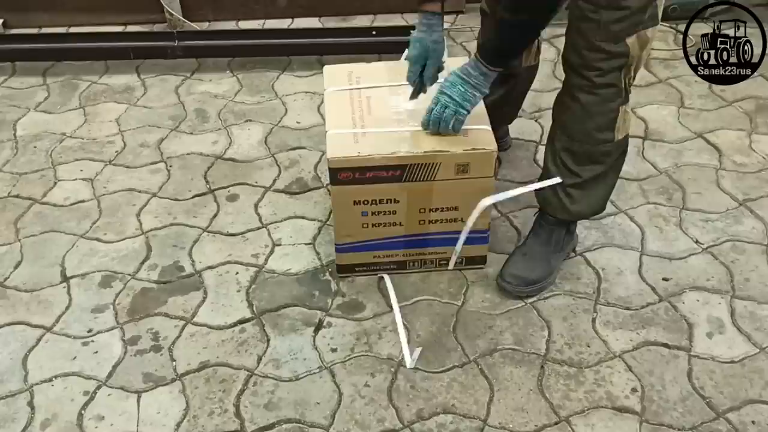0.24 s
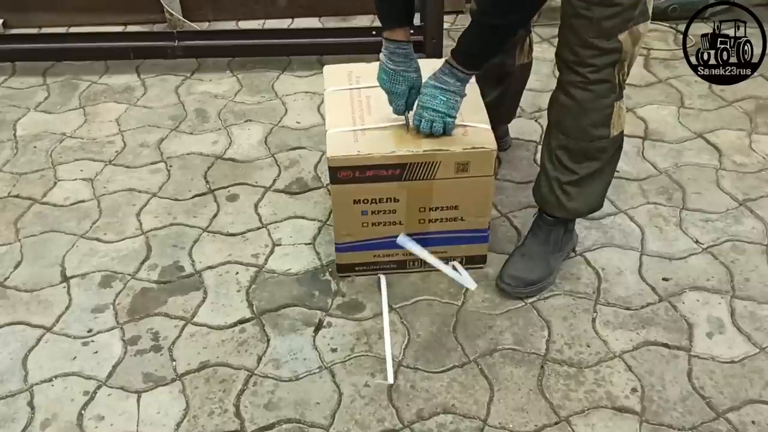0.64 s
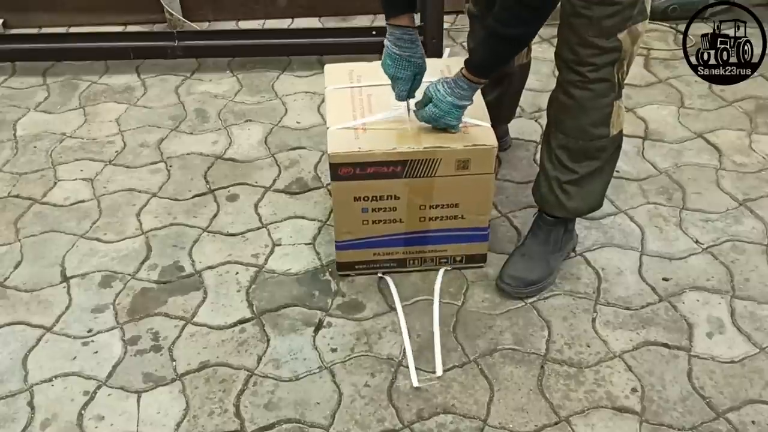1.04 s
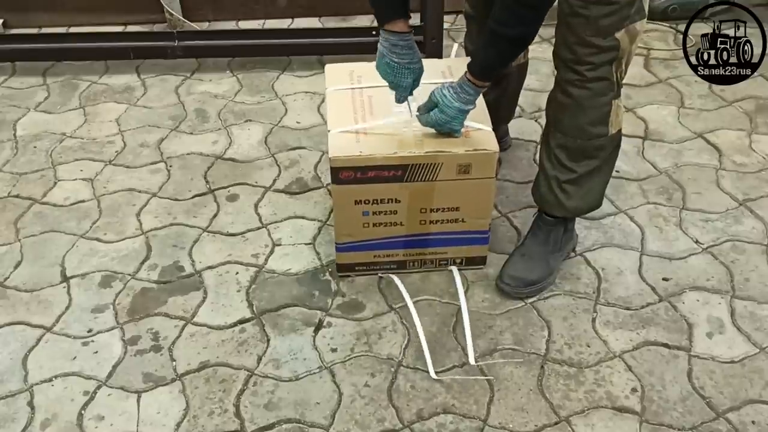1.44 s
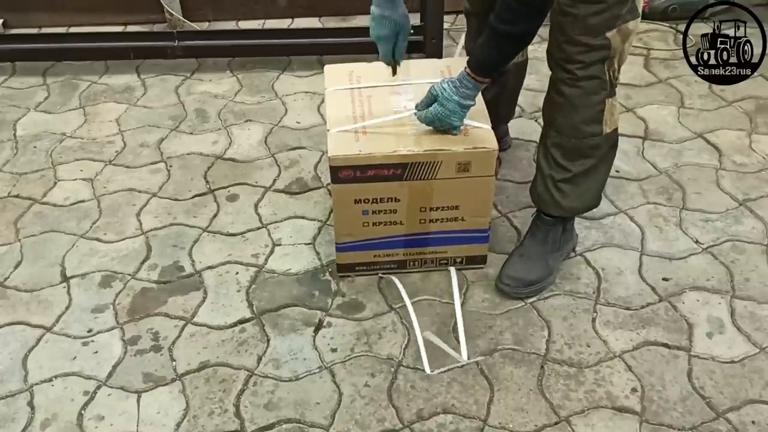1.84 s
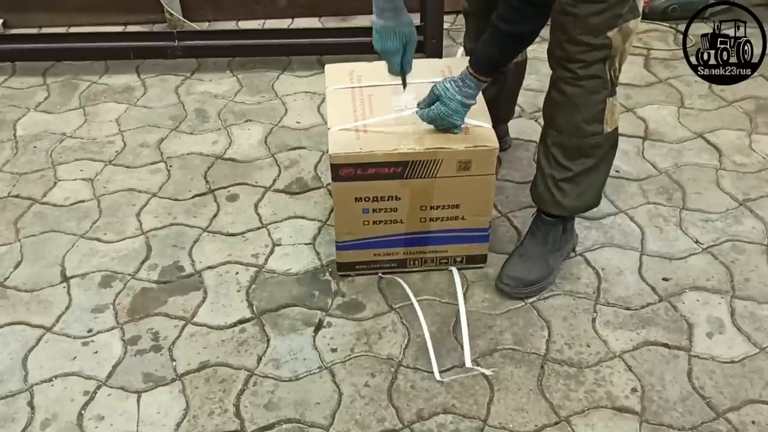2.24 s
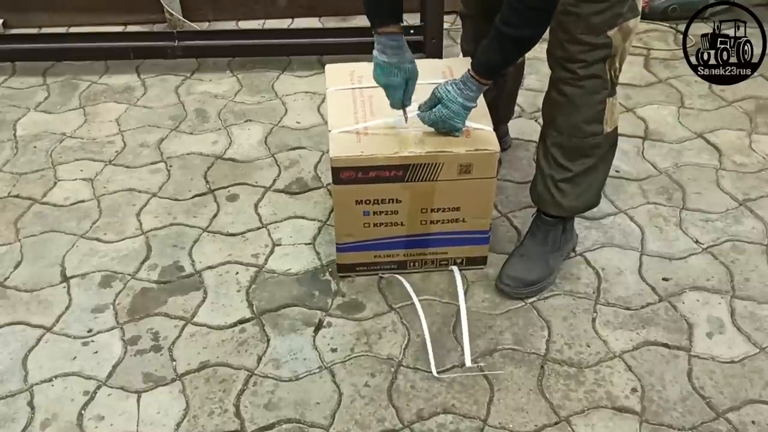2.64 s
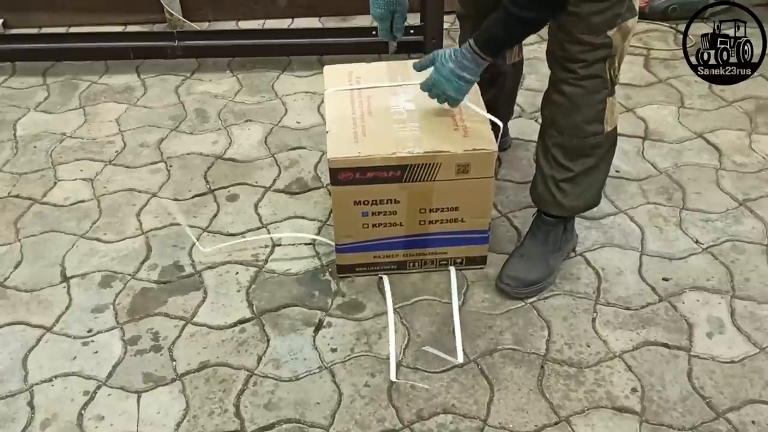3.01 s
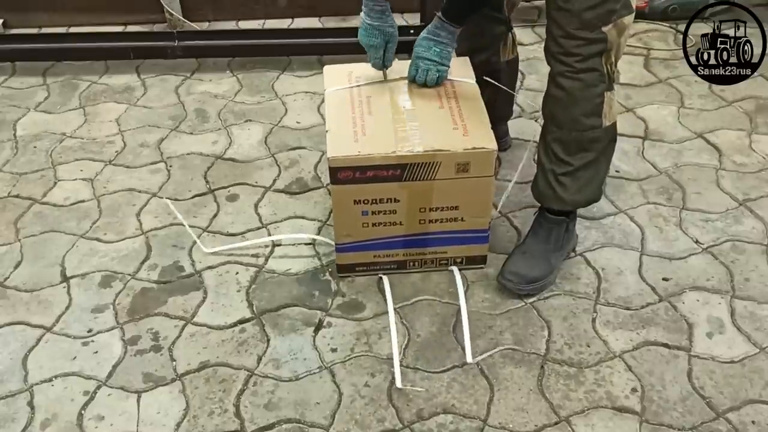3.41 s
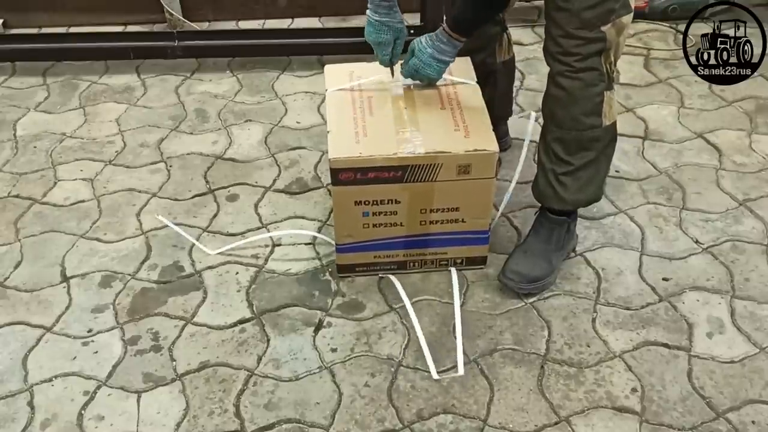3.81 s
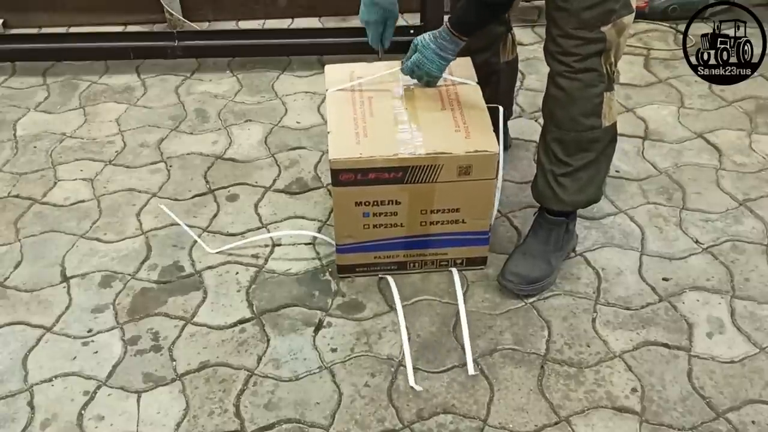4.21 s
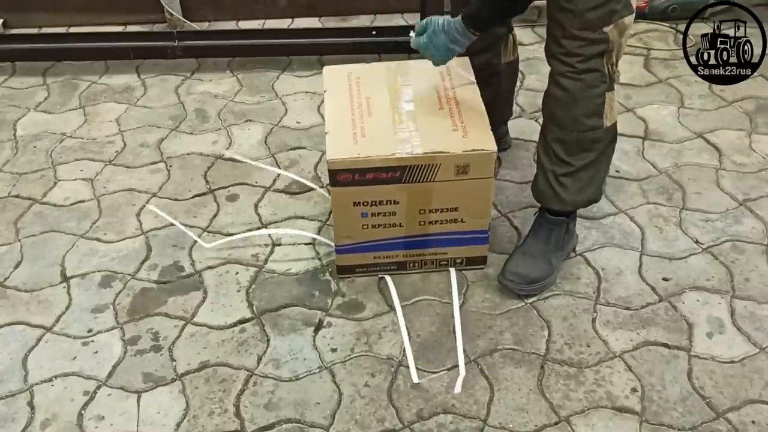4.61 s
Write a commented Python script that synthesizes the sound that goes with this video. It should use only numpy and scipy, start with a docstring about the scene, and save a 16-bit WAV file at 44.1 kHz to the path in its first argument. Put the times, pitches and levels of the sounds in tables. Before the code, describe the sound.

Plastic straps are cut from a cardboard box outdoors. After an opening crack come soft glove bumps and scrapes, then a cluster of small snaps and several louder ones, the last strong pair near the end. Small knife crunches lead into the cracks, and the strap ends ping and thump against the box. Walls echo briefly over a low hush, and the hardest hits distort the microphone slightly.

```python
"""A sharp snap dies away in a paved, walled yard, then more follow: taut plastic straps are being cut
on a cardboard box. The knife nicks a strap, it cracks apart and pings, and its ends slap the box,
which thumps. Gloves bump the card and loose straps scrape over card and paving, above quiet
outdoor air. The yard rings on, and the loudest snaps overload the microphone."""
import sys
import numpy as np
from scipy import signal
from scipy.fft import rfft, irfft
from scipy.io import wavfile
from scipy.ndimage import uniform_filter1d

SR = 44100
rng = np.random.default_rng(int(sys.argv[2]) if len(sys.argv) > 2 else 0)


def transcribe(u):
    """Save the signal u as a 16-bit wav file named by the first command-line argument.

    u: samples, shape (n,) or (channels, n), limited to [-1, 1]; the rate is SR.
    q: integer samples, one column per channel.
    """
    v = np.clip(np.atleast_2d(u).T, -1, 1)
    q = np.round(v * 32767).astype(np.int16)
    wavfile.write(sys.argv[1], SR, q)


N = 209651
LEAD = SR // 5  # pre-roll in samples, so the opening snap is already ringing at time zero
SPAN = N + LEAD
BLOW_T = np.arange(4096) / SR  # time axis of one short hit, in seconds

# Tone colours. Each row: frequency in Hz, relative level in dB.
AIR_COLOUR = [(20, -31), (70, -6.5), (150, 9.5), (400, -0.5), (800, 1), (1500, -6.5), (3500, -19.5),
              (5500, -45), (7000, -29), (10000, -20), (16000, -25)]  # low outdoor hush
YARD_COLOUR = [(40, -5.5), (120, -8.5), (250, -4), (400, 0), (600, -1), (1000, -2), (2000, -6), (4000, -5),
               (7000, -1), (9000, -9.5), (16000, -6)]  # what the walls send back
SCRAPE_COLOUR = [(100, -15), (500, 14), (1200, 0.5), (2200, 1.5), (3600, 4), (5400, -1.5), (6600, -4.5),
                 (8500, -24.5), (16000, -14.5)]  # strap edges dragging
SHUFFLE_COLOUR = [(25, -38.5), (70, 2.5), (120, 2.5), (220, -4), (400, -1.5), (800, -20.5), (2000, -38),
                  (16000, -95)]  # gloves on the hollow box
CRUNCH_COLOUR = [(100, -8), (380, 5), (700, -5.5), (1500, 0.5), (2500, -4), (4200, -6.5), (5400, -10),
                 (8000, -27), (16000, -54)]  # blade crunch, also used for glove scuffs
FIZZ_COLOUR = [(100, -37), (3000, -20), (5000, 4), (7200, 2), (8200, -14), (12000, -9.5), (16000, -8)]  # bright top of a nick
BOOM_COLOUR = [(40, -29), (70, -6.5), (130, -4), (220, 0.5), (300, -4.5), (420, -3), (600, -11.5),
               (1200, -31), (16000, -78)]  # the box's thump as it feeds the yard
SLAP_COLOUR = [(60, -34.5), (300, -17), (500, -2), (780, 2), (1100, -3), (1400, -3), (2200, -7),
               (5000, -32), (16000, -48)]  # strap ends hitting card
CRACK_COLOUR = [(100, -29), (700, -9.5), (1500, -2), (2500, 2), (2950, 0), (3500, 3), (4400, -1.5),
                (5400, -10.5), (6400, -7), (8000, -23), (16000, -30.5)]  # plastic parting
MIC_COLOUR = [(20, -12), (70, -5.5), (4600, -7), (5200, -14), (6300, -9.5), (8200, -5), (9000, -17),
              (11200, -18), (11900, -5), (16000, -12)]  # the microphone's response
# How long the yard rings. Each row: frequency in Hz, time to fall 60 dB in seconds.
YARD_DECAY = [(60, 0.52), (200, 0.63), (450, 0.61), (1400, 0.76), (3000, 0.72), (6000, 0.51), (9000, 0.63),
              (16000, 0.37)]
# Reflections off paving, box side and gate. Each row: delay in seconds, gain.
FIRST_ECHOES = [(.0038, .12), (0.0117, 0.088), (0.0194, .08)]
# Fader moves for loose straps and gloves. Each row: time in seconds, relative scrape and shuffle in dB.
HANDLING_LEVELS = [(0, -30.5, -39.5), (.38, -58, -50), (.46, -43.5, -38.5), (.52, -49.5, -43),
                   (.62, -50, -40), (.67, -44, -33.5), (.75, -56, -67), (.82, -44.5, -43),
                   (.93, -43, -48.5), (.98, -59, -66), (1.07, -51, -49.5), (1.16, -50.5, -42.5),
                   (1.28, -58, -54), (1.48, -49, -48.5), (1.7, -32, -37), (1.9, -94, -63),
                   (1.97, -47.5, -51), (2.1, -45, -37), (2.35, -51, -45), (2.6, -48.5, -41),
                   (2.75, -54, -48), (3.3, -53, -48.5), (3.37, -42.5, -40), (3.42, -52, -48.5),
                   (3.48, -47, -44.5), (3.58, -54, -49.5), (3.72, -40.5, -43), (3.85, -54, -52),
                   (3.98, -51.5, -48.5), (4.4, -54.5, -43.5), (4.75, -47, -55)]
# Hands landing on the box. Each row: start in seconds, bump in dB, panel pitch in Hz, scuff in dB.
HAND_BUMPS = [ (0.479, -32.5, 203, -37), (0.542, -27, 153, -41.5), (0.633, -28.5, 243, -37),
              (0.649, -24.5, 156, -39), (0.666, -43, 268, -34), (0.676, -24.5, 224, -34),
              (0.812, -36, 127, -41), (0.838, -31.5, 130, -43), (0.932, -41, 167, -52),
              (1.159, -43, 120, -46), (2.120, -36, 161, -49), (2.801, -35, 141, -56),
              (3.342, -43, 150, -47), (3.451, -41, 182, -47), (3.511, -31, 231, -42.5),
              (3.650, -37.5, 250, -43), (3.701, -37, 268, -46), (3.715, -35, 217, -38),
              (3.751, -36, 153, -49), ]
# The blade biting a strap. Each row: start in seconds, crunch in dB, fizz in dB, fade in seconds.
KNIFE_NICKS = [ (1.086, -36, -39.5, 0.0055), (1.323, -29, -32.5, 0.0067), (1.503, -46, -54, 0.003),
               (2.124, -33, -47, 0.017), (2.417, -64, -43.5, 0.0011), (2.464, -29, -47, 0.012),
               (2.696, -45, -61, 0.0025), (2.802, -25.5, -38, 0.0074), (2.825, -27.5, -41, .006),
               (4.008, -27.5, -42, 0.026), (4.457, -25.5, -39, 0.01), (4.475, -36, -49, 0.011), ]
# Lid and slack straps sounding on after a blow.
# Each row: start in seconds, centre in Hz, spread in Hz, level in dB, time to fall 60 dB in seconds.
AFTER_RINGS = [(-0.045, 227.7, 111, -15, 0.52), (1.345, 564, 26, -28, 0.23), (2.465, 1413, 80.6, -32, 0.74),
               (2.862, 369.2, 219.9, -12, 0.61), (3.199, 2166, 303, -45, 0.68),
               (4.507, 400, 190.4, -9.5, 0.7)]
# The box's resonances. Each row: pitch in Hz, relative level in dB, time to fall 60 dB in seconds.
BOX_MODES = [(102.6, -8.5, 0.081), (153, -0.5, 0.03), (227, 1, 0.039), (380.8, -0.5, 0.044),
             (576, -9.5, 0.031)]
# Straps parting and whipping the box. Each row: start in seconds, crack, slap and thump levels in dB,
# ping pitch in Hz, ping level in dB, relative send to the yard in dB.
STRAP_SNAPS = [ (-0.051, -12, -7.5, -3.5, 750, -15, -0.5), (0.482, -37.5, -35.5, -31, 1790, -40, -0.5),
               (1.0875, -33.5, -39.5, -31.5, 1700, -40.5, -0.5), (1.334, -27, -30, -40.5, 4210, -30, 0.5),
               (1.348, -27.5, -35.5, -43, 1610, -30.5, -3), (1.5276, -11.5, -30, -26.5, 2394, -23, 2),
               (1.5554, -22.5, -28.5, -22.5, 1350, -27, -3), (1.607, -17, -17.5, -13, 1380, -19, -1),
               (1.6334, -18, -21, -15, 1590, -17, -2.5), (2.1688, -12, -11.5, -11.5, 1980, -22.5, -3.5),
               (2.518, -22, -22.5, -20.5, 1390, -18, -2), (2.558, -31, -30.5, -30, 2350, -28, -5.5),
               (2.844, -25, -23, -32, 2110, -33, -17), (2.8576, -10.5, -3.5, -3.5, 885, -10, -1.5),
               (3.199, -42, -38, -45, 2150, -37, 3), (4.041, -7, -11, -9.5, 3390, -10, -6.5),
               (4.0522, -24, -11, -9, 724, -24, -3.5), (4.0575, -16, -8, -4.5, 762, -8.5, -4.5),
               (4.4986, -15, -17, -11, 6300, -17, -4), (4.5033, -13, -4.5, -1.5, 586, -9.5, 1),
               (4.679, -12, -17.5, -19, 1740, -20.5, -14.5), ]


def amp(db):
    """Decibels to gain."""
    return 10 ** (np.asarray(db) / 20)


def unit_rms(x):
    """Scales to rms 1."""
    return x / np.sqrt(np.mean(x ** 2) + 1e-20)


def unit_blow(x):
    """Scales a short sound to the energy of 10 ms at rms 1."""
    return x * np.sqrt(.01 * SR / (np.sum(x ** 2) + 1e-20))


def power(blow):
    """Power spectrum in steps of 1 Hz."""
    return abs(rfft(blow, SR)) ** 2


def curve_at(curve, hz):
    """Reads a curve along a log-frequency axis."""
    knots_hz, values = np.transpose(curve)
    return np.interp(np.log(hz + 1), np.log(knots_hz + 1), values)


def add(mix, start_s, sound):
    """Lays a sound into the mix, allowing for the pre-roll."""
    part = mix[max(round(start_s * SR) + LEAD, 0):][:len(sound)]
    part += sound[:len(part)]


def response(curve, size=4096):
    """Minimum-phase impulse response with the given colour."""
    log_gain = np.log(amp(curve_at(curve, abs(np.fft.fftfreq(size, 1 / SR)))))
    spectrum = np.exp(np.conj(signal.hilbert(log_gain)))
    return np.fft.ifft(spectrum).real[:size // 2]


def colour(x, curve):
    """Equalises x with the given curve."""
    return signal.oaconvolve(x, response(curve))[:len(x)]


def excite(force, curve):
    """A body of the given colour answers a force; a unit click gives one unit blow."""
    return signal.oaconvolve(force, unit_blow(response(curve)))[:len(force)]


def attack(t, rise_s):
    """An onset that eases up to full level."""
    return 1 - np.exp(-t / rise_s)


def decay(t, t60):
    """A fade that falls 60 dB in t60 seconds."""
    return np.exp(-np.log(1000) * t / t60)


def ring(hz, t60):
    """One dying mode."""
    return np.sin(2 * np.pi * hz * BLOW_T) * decay(BLOW_T, t60)


def tear(rise_s, fall_s):
    """Fibres parting in a quick burst, with an even spread of energy over frequency."""
    envelope = attack(BLOW_T, rise_s) * np.exp(-BLOW_T / fall_s)
    spectrum = rfft(rng.standard_normal(len(BLOW_T)) * envelope)
    local_power = uniform_filter1d(abs(spectrum) ** 2, size=71)
    whitened = irfft(spectrum / np.sqrt(abs(local_power) + 1e-12))
    burst = whitened * np.exp(-BLOW_T / (10 * fall_s))
    return burst / np.linalg.norm(burst)


def outdoor_air():
    """A steady, quiet bed of dark noise."""
    return amp(-49.5) * unit_rms(colour(rng.standard_normal(SPAN), AIR_COLOUR))


def yard_tail(source_spectrum, build_s=0.024, size=512):
    """Scattered echoes swell as they return, then die band by band."""
    hz, t, bands = signal.stft(rng.standard_normal(SR), SR, nperseg=size)
    bands = bands * decay(t, curve_at(YARD_DECAY, hz)[:, None])
    tail = signal.istft(bands, SR, nperseg=size)[1][:SR]
    tail *= attack(np.arange(SR) / SR, build_s)
    walls = amp(curve_at(YARD_COLOUR, np.fft.rfftfreq(SR, 1 / SR)))
    return irfft(rfft(tail / np.linalg.norm(tail)) * source_spectrum * walls)


def yard_echo(hands, ping_send_db=-10):
    """The walls return the handwork and give each snap its own tail, its parts adding by power."""
    crack, slap, boom = (power(unit_blow(response(curve)))
                         for curve in (CRACK_COLOUR, SLAP_COLOUR, BOOM_COLOUR))
    echo = amp(-1) * signal.oaconvolve(hands, yard_tail(0.99))[:SPAN]
    for start_s, crack_db, slap_db, thump_db, ping_hz, ping_db, send_db in STRAP_SNAPS:
        ping = power(strap_ping(ping_hz))  # beams mostly at the microphone, so the yard gets less
        parts = (crack_db, crack), (slap_db, slap), (thump_db, boom), (ping_db + ping_send_db, ping)
        snap_power = sum(amp(db) ** 2 * spectrum for db, spectrum in parts)
        add(echo, start_s, amp(send_db) * yard_tail(np.sqrt(snap_power)))
    return echo


def first_echoes(x):
    """Single reflections from the nearest hard surfaces."""
    return sum(gain * np.pad(x, (round(delay_s * SR), 0))[:len(x)] for delay_s, gain in FIRST_ECHOES)


def friction(curve, slips_per_s, spread_db):
    """Many tiny slips of uneven size blur into a grainy rub."""
    sizes = amp(spread_db * np.minimum(rng.exponential(1, SPAN), 4))
    signs = rng.choice([-1, 1], SPAN)
    slipping = rng.random(SPAN) < slips_per_s / SR
    return unit_rms(colour(sizes * signs * slipping, curve))


def handling():
    """Strap edges scrape brightly while gloves shuffle on the hollow box."""
    t = (np.arange(SPAN) - LEAD) / SR
    times_s, scrape_db, shuffle_db = np.transpose(HANDLING_LEVELS)
    scrape = friction(SCRAPE_COLOUR, slips_per_s=1700, spread_db=3.0)
    shuffle = friction(SHUFFLE_COLOUR, slips_per_s=370, spread_db=5.0)
    scrape *= amp(np.interp(t, times_s, scrape_db))
    shuffle *= amp(np.interp(t, times_s, shuffle_db))
    return amp(0.5) * (scrape + shuffle)


def hand_bumps():
    """A soft push rings one panel and its overtone, and the glove scuffs the card."""
    panel, scuff = np.zeros((2, SPAN))
    for start_s, bump_db, hz, scuff_db in HAND_BUMPS:
        modes = ring(hz, t60=0.035) - .5 * ring(1.537 * hz, t60=0.038)
        add(panel, start_s, amp(bump_db) * unit_blow(modes * attack(BLOW_T, rise_s=0.0033)))
        add(scuff, start_s, amp(scuff_db) * tear(rise_s=0.003, fall_s=0.0039))
    return panel + excite(scuff, CRUNCH_COLOUR)


def knife_nicks():
    """The blade crunches through the strap's fibres, with a bright fizz on top."""
    crunch, fizz = np.zeros((2, SPAN))
    for start_s, crunch_db, fizz_db, fade_s in KNIFE_NICKS:
        add(crunch, start_s, amp(crunch_db) * tear(rise_s=0.0026, fall_s=fade_s))
        add(fizz, start_s, amp(fizz_db) * tear(rise_s=0.0016, fall_s=fade_s))
    return excite(crunch, CRUNCH_COLOUR) + excite(fizz, FIZZ_COLOUR)


def after_ring(centre_hz, spread_hz, db, t60):
    """The lid or a slack strap sounds on: close modes swell, beat and die away."""
    t = np.arange(SR) / SR
    offsets = np.linspace(-.5, .5, num=9) + 0.0505 * rng.standard_normal(9)
    modes_hz = centre_hz + spread_hz * offsets
    cycles = modes_hz[:, None] * t + rng.random((9, 1))
    cluster = unit_rms(np.sin(2 * np.pi * cycles).sum(0))
    return amp(db) * cluster * attack(t, rise_s=0.034) * decay(t, t60)


def box_thump():
    """Each blow lands on another spot, so the box's panels answer a little differently."""
    detune = 1 + 0.078 * rng.standard_normal(len(BOX_MODES))
    modes = sum((-1) ** k * amp(db) * ring(hz * detune[k], t60)
                for k, (hz, db, t60) in enumerate(BOX_MODES))
    return unit_blow(modes * attack(BLOW_T, rise_s=0.0004))


def strap_ping(hz):
    """The freed strap end rings briefly; high pings die faster."""
    t60 = 3.15 / (90 + 0.034 * hz)
    return unit_blow(ring(hz, t60) * attack(BLOW_T, rise_s=.0008))


def strap_snaps():
    """Each strap cracks and pings, slaps the card, and the box thumps beneath it."""
    crack, slap, ringing = np.zeros((3, SPAN))
    for start_s, crack_db, slap_db, thump_db, ping_hz, ping_db, _ in STRAP_SNAPS:
        add(crack, start_s, amp(crack_db) * tear(rise_s=.0005, fall_s=.0019))
        add(slap, start_s, amp(slap_db) * tear(rise_s=.0005, fall_s=.003))
        add(ringing, start_s, amp(thump_db) * box_thump() + amp(ping_db) * strap_ping(ping_hz))
    return excite(crack, CRACK_COLOUR) + excite(slap, SLAP_COLOUR) + ringing


def scene():
    """Snaps and handwork up front, the yard's echoes and air behind, in mono."""
    hands = handling() + knife_nicks() + hand_bumps()
    direct = hands + strap_snaps()
    for start_s, *cluster in AFTER_RINGS:
        add(direct, start_s, after_ring(*cluster))
    mix = outdoor_air() + amp(-3) * yard_echo(hands) + first_echoes(direct) + direct
    return mix[None, LEAD:]


def record(dry):
    """The microphone colours the sound and clips at full scale; a low-pass trims the very top."""
    clipped = np.clip(colour(dry[0], MIC_COLOUR), -1, 1)
    low_pass = signal.firwin(511, cutoff=16000, window=("kaiser", 9), fs=SR)
    return signal.oaconvolve(clipped, low_pass, "same")[None]


dry = scene()
out = record(dry)
transcribe(out)
```